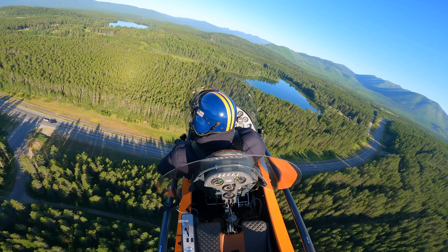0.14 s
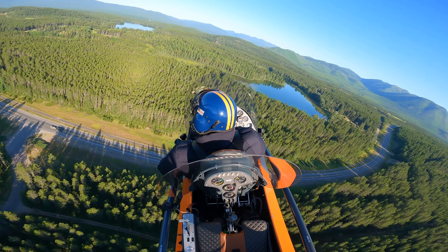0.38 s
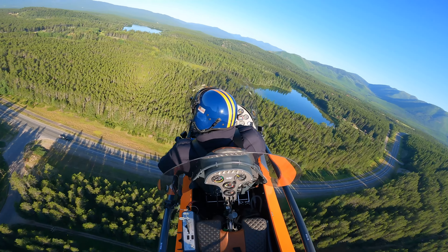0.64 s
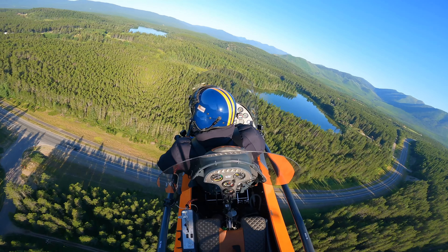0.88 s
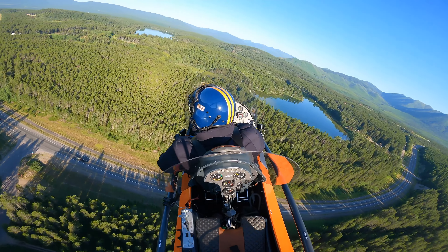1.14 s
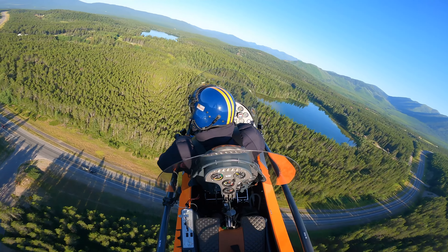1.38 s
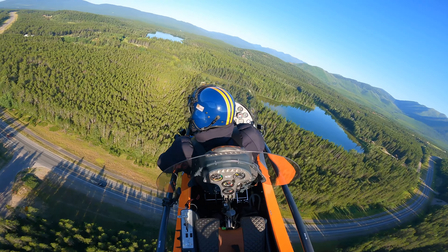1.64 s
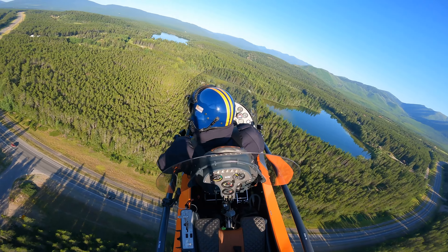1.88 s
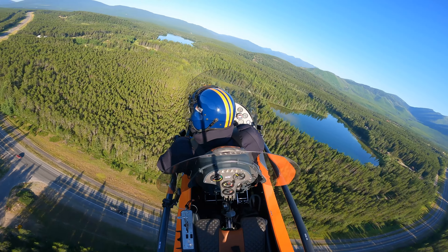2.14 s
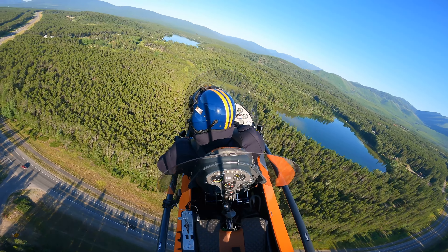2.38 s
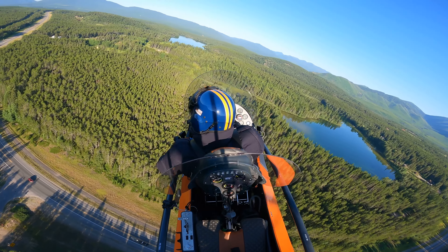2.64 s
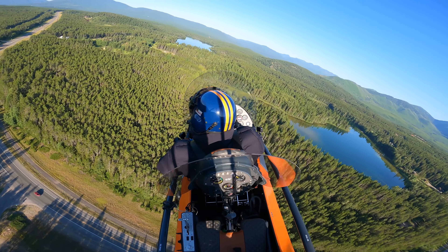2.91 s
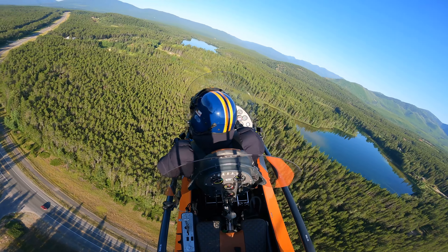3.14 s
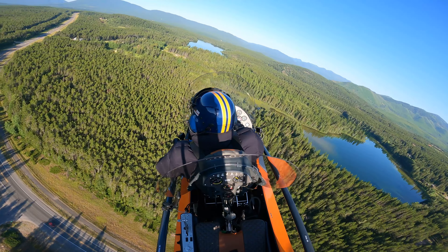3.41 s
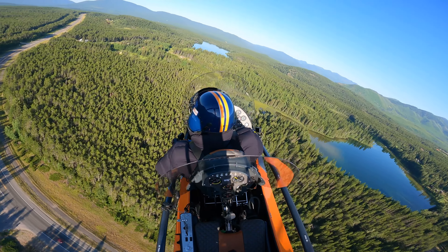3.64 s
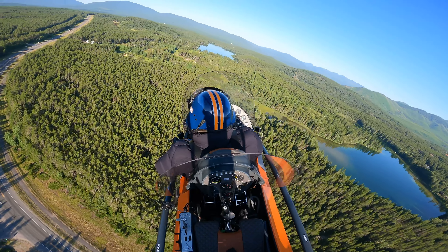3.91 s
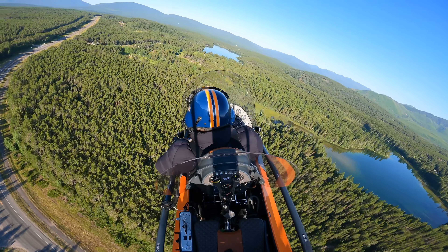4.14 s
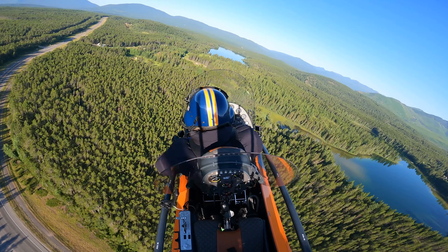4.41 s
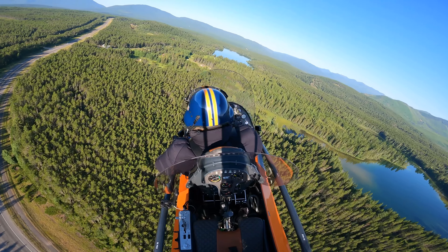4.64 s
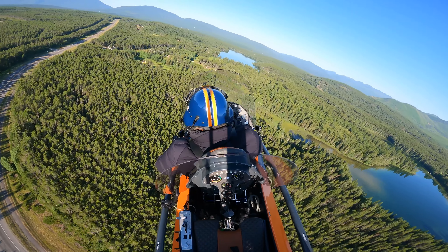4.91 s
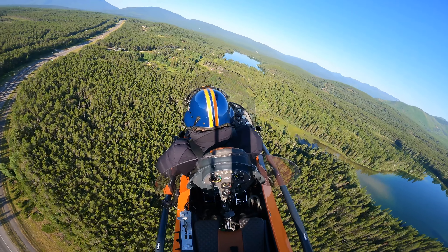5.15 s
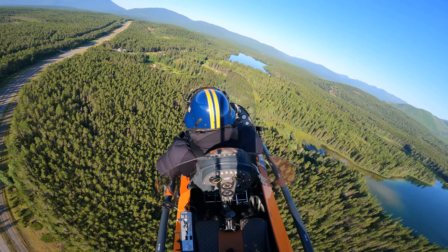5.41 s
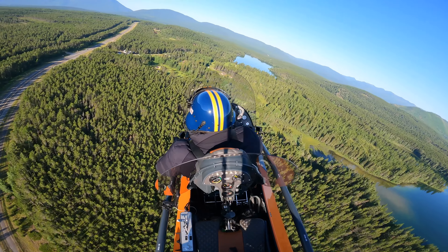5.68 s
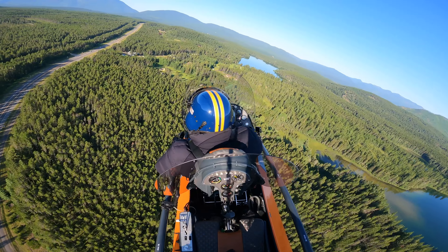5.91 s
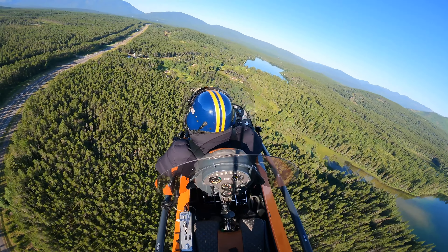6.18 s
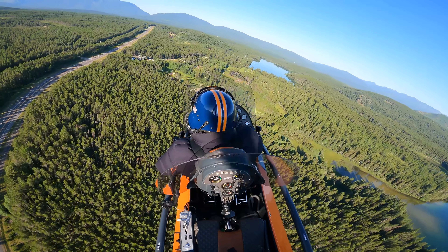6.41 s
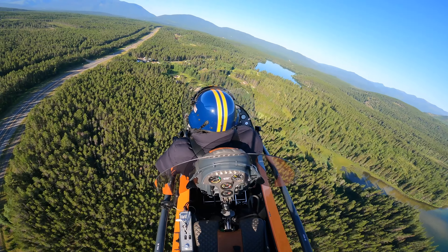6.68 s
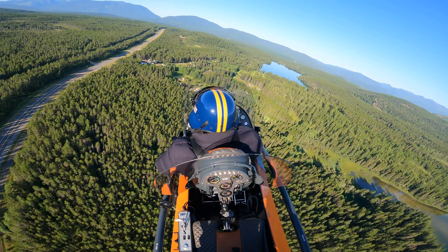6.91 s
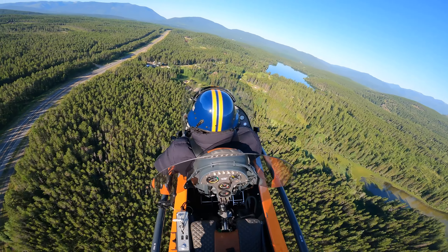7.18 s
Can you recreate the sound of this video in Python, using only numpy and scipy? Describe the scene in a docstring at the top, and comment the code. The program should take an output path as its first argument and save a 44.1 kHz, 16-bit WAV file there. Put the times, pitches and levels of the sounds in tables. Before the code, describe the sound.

Continuous in-flight engine noise, already running and never stopping: a dense low hum with geared propeller beat and gritty exhaust roar, close to the microphone on the mast and without any room echo. Airstream rumble swells and eases slowly beneath it. Faint airy rotor swishes pass about thirteen times a second, uneven in strength. A short low surge comes early, a dip midway, and the pitch creeps up very slightly towards the end.

```python
"""A gyroplane cruises in open air, heard close by from a microphone on its mast, for 7.3 s.
From the start a four-cylinder engine drones in sine orders with a geared three-blade pusher propeller;
noise throbs with each firing as roar, low noise buffets the microphone, and two free-turning rotor blades
thump, whistle and hiss overhead. The low roar surges near 1.2 s and sags near 4.1 s, just before
the airstream swells most; the engine speed creeps up to the end."""
import sys
import numpy as np
from scipy import signal
from scipy.io import wavfile
from scipy.ndimage import uniform_filter1d

SR = 44100
rng = np.random.default_rng(int(sys.argv[2]) if len(sys.argv) > 2 else 0)


def generate_wav(signal):
    """Clip the signal to [-1, 1] and save it as 16-bit WAV at the path in sys.argv[1]."""
    frames = np.transpose(np.atleast_2d(signal))
    scaled = np.clip(frames, -1, 1) * 32767
    pcm = np.round(scaled).astype(np.int16)
    wavfile.write(sys.argv[1], SR, pcm)


def nominal_scale(level):
    """Amplitude ratio for a level in decibels (scalar or array-like)."""
    x = np.asarray(level, float) / 20
    return 10 ** x


N = 321930


def rms_one(x):
    """Scales to rms 1."""
    return x / np.sqrt(np.mean(x ** 2) + 1e-20)


def in_time(rows):
    """Columns of a curve table whose first column is time, one value a sample."""
    time_s, *columns = np.transpose(rows)
    return [np.interp(np.arange(N) / SR, time_s, column) for column in columns]


def at_hz(rows, hz):
    """Columns of a spectrum table at one frequency, interpolated along log frequency."""
    table_hz, *columns = np.transpose(rows)
    return [np.interp(np.log(hz), np.log(table_hz), column) for column in columns]


def drift(corner_hz):
    """Slow chance of spread 1: noise at every 40th sample through a double one-pole low-pass."""
    pole = np.exp(-2 * np.pi * corner_hz * 40 / SR)
    steps = rng.standard_normal(N // 40 + 2002)
    slow = signal.lfilter([1], [1, -2 * pole, pole * pole], steps)[2000:]   # settled part only
    slow = rms_one(slow - slow.mean())
    return np.interp(np.arange(N) / 40, np.arange(len(slow)), slow)


def per_cycle(cycles, spread):
    """One random value for each cycle, held until the next."""
    values = spread * rng.standard_normal(int(cycles[-1]) + 3)
    return values[np.floor(cycles + .5).astype(int)]


def band(x, low_hz, high_hz):
    """Butterworth band-pass."""
    return signal.sosfilt(signal.butter(2, [low_hz, high_hz], "band", fs=SR, output="sos"), x)


def noise_bands(low_hz, count):
    """Quarter-octave bands of white noise with their centres; neighbours are unrelated."""
    white = rng.standard_normal((2, N))
    edges = low_hz * 2 ** (np.arange(count + 1) / 4)
    bands = []
    for k, (low, high) in enumerate(zip(edges, edges[1:])):
        bands.append((np.sqrt(low * high), band(white[k % 2], low, high)))
    return bands


def tone(angle, level_db, waver_db):
    """A sine whose strength wavers with the turbulent air on its path."""
    strength = np.sqrt(2) * nominal_scale(level_db + waver_db * drift(2.56))
    return strength * np.sin(angle)


def exhaust(firing):
    """All orders cross zero together: a suction dip, then a steep pressure rise at each firing."""
    # wavering hum: start_s, first_order_db, second_order_db (rms)
    hum = [(0, -29.5, -30), (1.25, -33.5, -30.5), (1.9, -30, -29.5), (2.8, -30, -28.5), (3.7, -31.5, -33.5),
           (4.8, -33, -27.5), (5.5, -28, -31.5), (6.5, -30.5, -29.5), (7.3, -29.5, -27.5)]
    # orders above the second: firing_rate_multiple, level_db (rms)
    upper_orders = [(3, -38.5), (4, -43), (5, -47.5), (6, -68.5), (7, -58), (8, -56), (9, -60.5), (10, -69),
                    (13, -68.5), (18, -73.5), (19, -69.5), (28, -81.5)]
    first_db, second_db = in_time(hum)
    angle_lead = 0.16   # radians of the firing cycle
    out = tone(firing + angle_lead, first_db, waver_db=0.2)
    out = out + tone(2 * firing + angle_lead, second_db, waver_db=1.6)
    return out + sum(tone(k * firing + angle_lead, db, waver_db=1.0) for k, db in upper_orders)


def propeller(firing):
    """Blade tones, locked to the engine by the gearbox."""
    # blade orders: blade_rate_multiple, level_db (relative to base_db)
    blade_orders = [(1, 1.5), (2, 1.5), (4, -11.5), (6, -27.5)]
    base_db = -40.5
    blade = 7 / 11 * firing   # blade passings per firing
    return sum(tone(k * blade, base_db + db, waver_db=2.0) for k, db in blade_orders)


def roar(firing, air_db):
    """Exhaust and slipstream noise swells just before each pressure rise, each puff with its own strength."""
    # spectrum: pitch_hz, density_db (relative, per Hz), throb_db (per unit of swell)
    roar_spectrum = [(93, -8.5, -10.5), (157, 3.5, 2), (252, 0.5, -5.5), (367, 2, 3), (417, -5, 3.5),
                     (750, -5, 4), (850, -9, 2.5), (1000, -8.5, 3), (1510, -14, 4.5), (2000, -21, 2.5),
                     (2860, -27, 1.6), (4400, -35, 1), (5350, -42, 0.4), (7650, -44.5, -0.5),
                     (8200, -67, -2), (13000, -70.5, 4.5)]
    # how the roar follows the airstream: pitch_hz, share (dB per dB)
    airstream_share = [(250, -.3), (700, -0.15), (1500, 0.79), (8000, 0.42)]
    # surge and sag below 300 Hz: centre_s, change_db, length_s (Gaussian spread)
    rumble_surges = [(1.248, 3.5, .2), (4.1, -3.5, 0.24)]
    angle = firing + 1.29
    pulse = np.cos(angle) + .3 * np.cos(2 * angle)
    swell = pulse + (1 + pulse) * per_cycle(angle / (2 * np.pi), spread=0.11)
    gusts_db = .15 * drift(5.4) + 1.35 * drift(38.0)
    surge_db = 0
    for centre_s, change_db, length_s in rumble_surges:
        surge_db = surge_db + change_db * np.exp(-.5 * ((np.arange(N) / SR - centre_s) / length_s) ** 2)
    out = 0
    for hz, noise in noise_bands(84.86, count=29):
        level_db, throb_db = at_hz(roar_spectrum, hz)
        slow_db = at_hz(airstream_share, hz)[0] * air_db + surge_db * (hz < 300)
        # gusts flutter all bands above 400 Hz together, in full from about 2.3 kHz
        gust_share = 1.01 * np.clip(np.log2(hz / 400) / 2.5, 0, 1)
        flutter_db = gust_share * gusts_db + .6 * drift(9.0)
        out = out + noise * nominal_scale(level_db + slow_db + throb_db * swell + flutter_db)
    return nominal_scale(-37.5) * out / np.std(band(out, 950, 4000))   # level within 950-4000 Hz


def passing(turns, width):
    """A bump once a turn, width in turns, with a strength that varies from pass to pass."""
    from_centre = (turns + .5) % 1 - .5
    return nominal_scale(per_cycle(turns, spread=1.3)) * np.exp(-.5 * (from_centre / width) ** 2)


def whistle(hz, width_hz):
    """Noise in a narrow band around a steady or moving pitch."""
    lowpass = signal.butter(2, width_hz / 2, fs=SR, output="sos")
    slow = signal.sosfilt(lowpass, rng.standard_normal((2, N)))
    angle = 2 * np.pi * np.cumsum(hz + np.zeros(N)) / SR
    return rms_one(slow[0] * np.cos(angle) + slow[1] * np.sin(angle))


def rotor():
    """Each blade passing overhead whistles at its trailing edge, hisses broadly and thumps."""
    # rotor speed: start_s, turns_per_s
    rotor_speed = [(0, 6.59), (1.2, 6.73), (1.5, 6.84), (3.3, 6.74), (6.5, 6.734), (7.3, 6.645)]
    # whistles as the disc tilts through the turn: start_s, first_blade_db, first_blade_middle_hz, second_blade_db
    blade_whistles = [(0, -61.5, 7050, -70), (1.6, -61, 7050, -66), (2.2, -66, 7000, -59.5),
                      (2.6, -62, 5900, -58.5), (3.3, -66.5, 6360, -62), (3.9, -60, 7190, -60),
                      (4.4, -62, 7120, -63.5), (5.2, -63, 6320, -61), (6.4, -63, 6260, -61),
                      (7.3, -65.5, 6210, -60.5)]
    # thump orders: blade_passing_rate_multiple, level_db (rms)
    thump_orders = [(2, -61), (4, -48.5), (5, -49), (6, -48), (7, -63), (11, -42)]
    turns = .157 + np.cumsum(in_time(rotor_speed)[0]) / SR   # first blade's position
    first_db, first_hz, second_db = in_time(blade_whistles)
    falling = 1 - .08 * np.sin(2 * np.pi * turns)   # the pitch drops as the blade sweeps by
    first = nominal_scale(first_db) * passing(turns - .02, 0.056) * whistle(first_hz * falling, width_hz=920)
    second = nominal_scale(second_db) * passing(turns + .49, 0.027) * whistle(5940, width_hz=770)
    broad = rms_one(band(rng.standard_normal(N), 3900, 8600))
    hiss = nominal_scale(-69.5) * passing(2 * turns + 0.85, 0.087) * broad
    blade_angle = 4 * np.pi * turns   # two blades a turn
    thump = sum(tone(k * blade_angle, db, waver_db=2.5) for k, db in thump_orders)
    return first + second + hiss + thump


def buffet(air_db):
    """Lumpy low noise of the airstream on the microphone port, swelling with it."""
    # spectrum: pitch_hz, density_db (relative, per Hz)
    buffet_spectrum = [(10, -20.5), (22, -1.5), (50, -3.5), (62, -6.5), (85, -2.5), (130, -6)]
    out = 0
    for hz, noise in noise_bands(9.94, count=15):
        out = out + noise * nominal_scale(at_hz(buffet_spectrum, hz)[0] + 1.0 * drift(6.8))
    return nominal_scale(-35.6 + .9 * air_db) * rms_one(out)


def scene():
    """Engine, propeller, airstream and rotor at one microphone."""
    # engine speed: start_s, firings_per_s
    engine_speed = [(0, 155.65), (1.5, 155.7), (3, 155.75), (4, 156.0), (6, 156.1), (7.3, 156.45)]
    # slow swell of the airstream about its mean: start_s, level_db
    airstream = [(0, -1.2), (.7, 0), (1.35, 0.85), (2.0, 0.04), (2.8, -0.9), (3.5, 0), (4.3, 1.66),
                 (5.0, 0.9), (5.5, 0.1), (6.1, -1), (6.7, -0.5), (7.3, 1.1)]
    firing = 2 * np.pi * np.cumsum(in_time(engine_speed)[0]) / SR
    air_db, = in_time(airstream)
    drone = exhaust(firing) + propeller(firing)
    mix = drone + roar(firing, air_db) + rotor() + buffet(air_db)
    return mix[None]


def top_cut(x):
    """Nothing passes above the cut-off."""
    return signal.sosfilt(signal.butter(12, 13930, fs=SR, output="sos"), x)


def record(dry):
    """Gain control evens the level in part; the strongest peaks are rounded."""
    power = uniform_filter1d(dry ** 2, size=2200, axis=1)   # over 50 ms
    even = dry * (power / power.mean() + 1e-6) ** -.15
    rounded = .45 * np.tanh(even / 0.44)
    # the shielded port dulls the top
    dulled = signal.sosfilt(signal.butter(3, 11800, fs=SR, output="sos"), rounded)
    return top_cut(dulled)


dry = scene()
out = record(dry)
generate_wav(out)
```